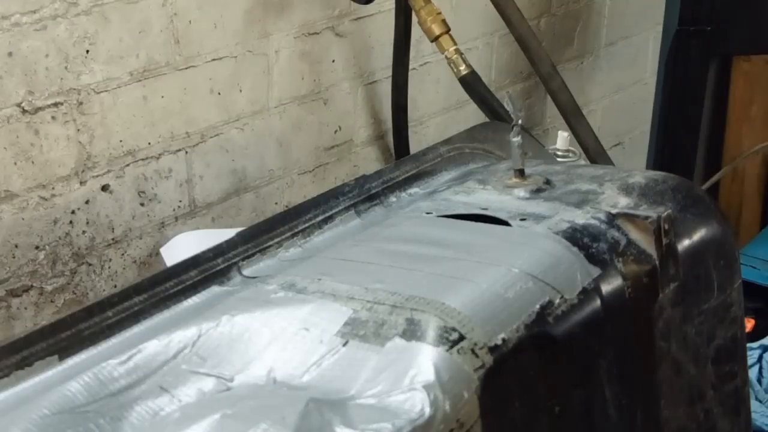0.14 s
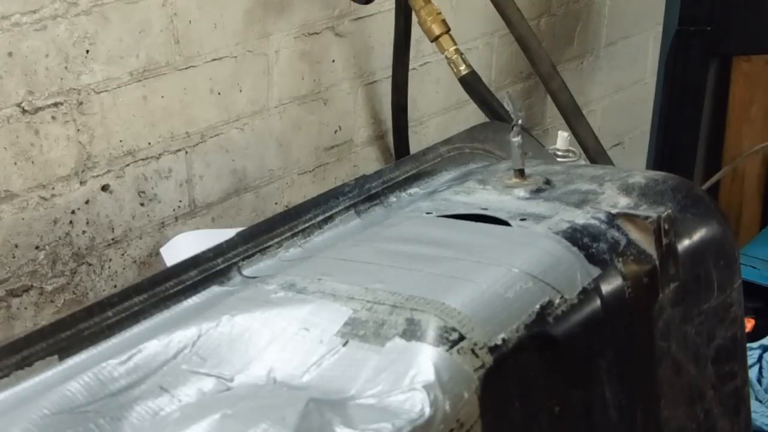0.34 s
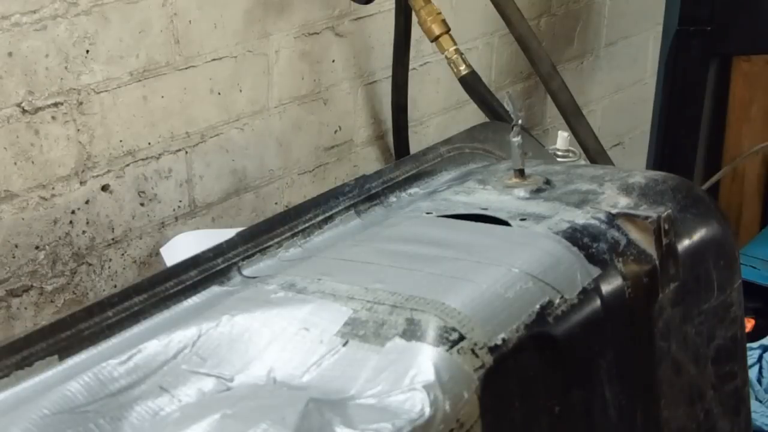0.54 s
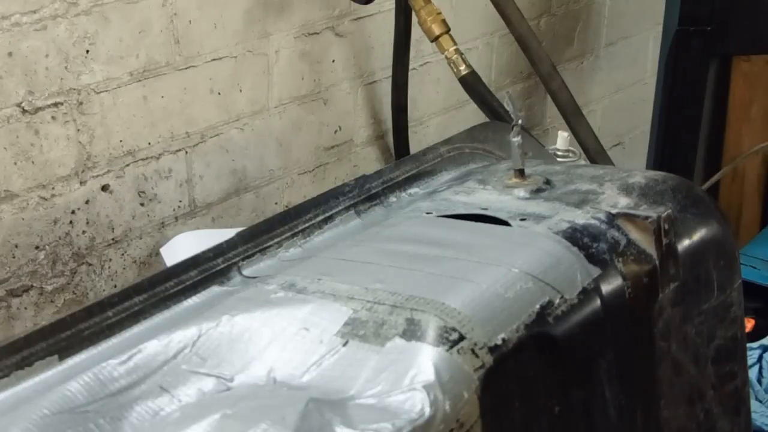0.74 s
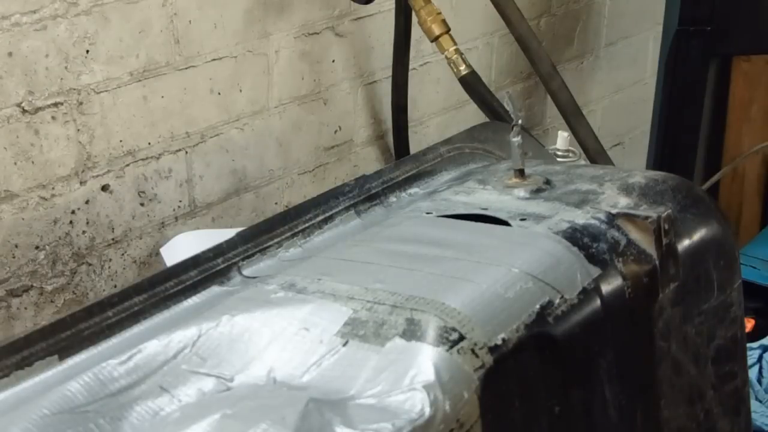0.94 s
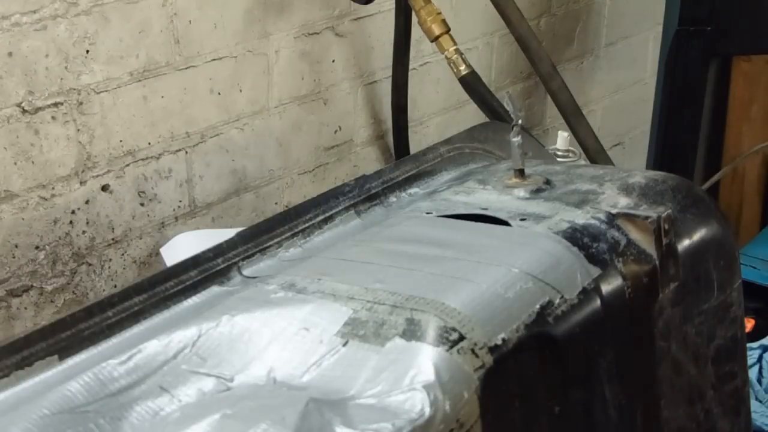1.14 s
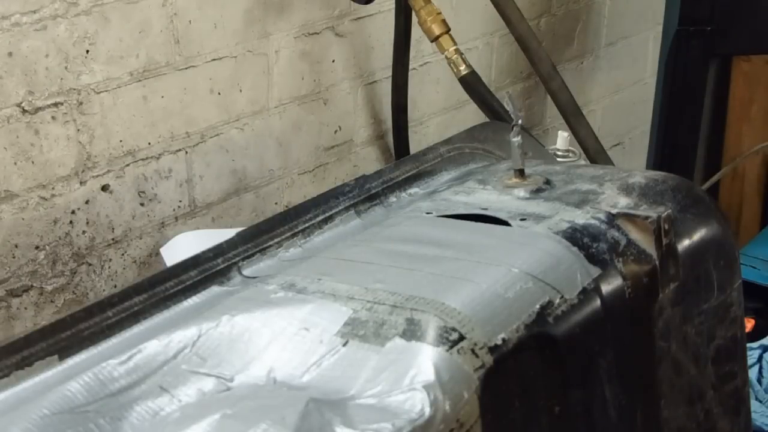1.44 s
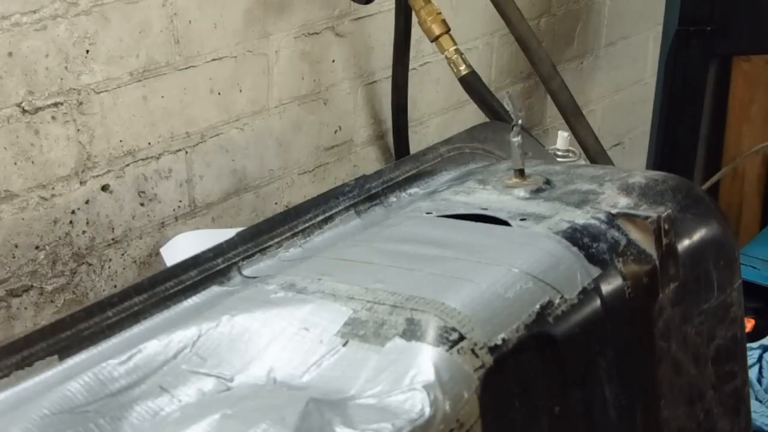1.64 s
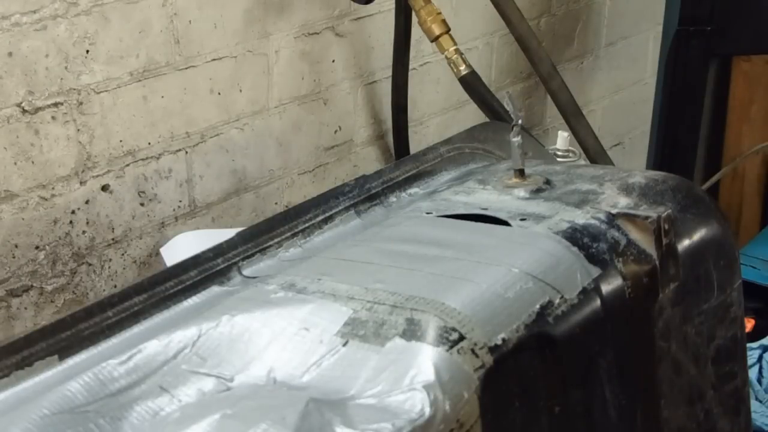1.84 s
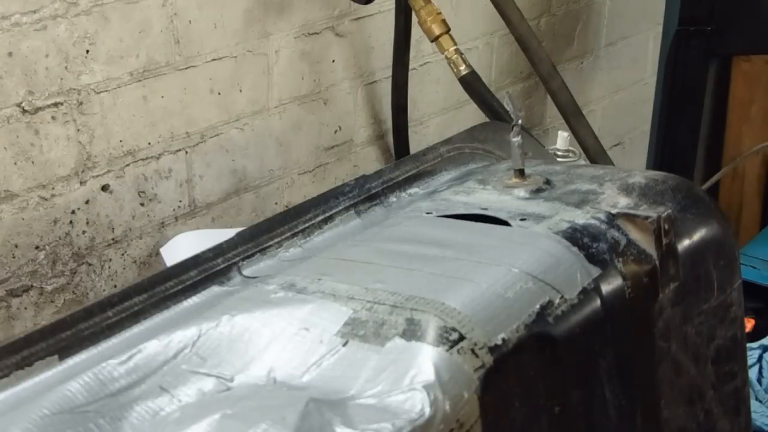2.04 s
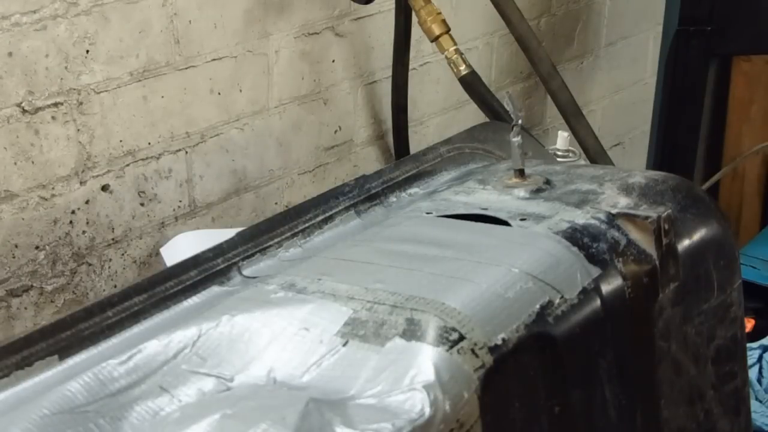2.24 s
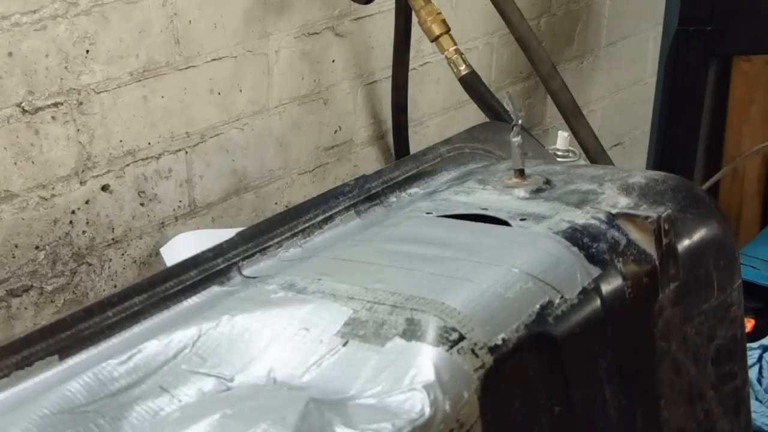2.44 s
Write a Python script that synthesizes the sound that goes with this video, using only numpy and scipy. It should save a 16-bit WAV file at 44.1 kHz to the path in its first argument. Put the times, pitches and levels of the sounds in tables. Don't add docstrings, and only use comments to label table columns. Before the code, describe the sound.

Quick crackling rips of adhesive tape, separated by pauses, with a faint ringing off hard walls

```python
import sys
import numpy as np
from scipy import signal
from scipy.fft import rfft, irfft, next_fast_len
from scipy.io import wavfile
from scipy.ndimage import uniform_filter1d

SR = 44100
rng = np.random.default_rng(int(sys.argv[2]) if len(sys.argv) > 2 else 0)


def amplitude_ratio(level_db):
    exponent = np.asarray(level_db, float) / 20
    return 10 ** exponent


def to_wav(s):
    ch = np.atleast_2d(s).T
    pcm = np.round(np.clip(ch, -1, 1) * 32767)
    wavfile.write(sys.argv[1], SR, pcm.astype(np.int16))


N = 114660
EARLY_S = 0.12
M = N + round(EARLY_S * SR)

# t/s, level/dB
PULL_EFFORT = [
    [(.2155, -33), (.226, -27), (.24, -21), (.25, -16.5), (.27, -18.5), (.292, -20.5), (.31, -28.5),
     (.345, -35)],
    [(.467, -33), (.481, -29.5), (.493, -26.5), (.497, -18), (.508, -21.5), (.525, -17), (.545, -19),
     (.6, -27)],
    [(.756, -44), (.772, -37), (.781, -30.5), (.792, -23), (.806, -29.5), (.825, -32.5), (.85, -40.5),
     (.89, -40)],
    [(1.018, -36.5), (1.029, -48), (1.034, -25.5), (1.045, -22.5), (1.058, -25.5), (1.07, -24.5),
     (1.085, -33), (1.13, -33)],
    [(1.331, -36), (1.342, -44), (1.347, -33), (1.353, -35), (1.375, -40), (1.4, -45.5), (1.44, -34)],
    [(1.681, -39), (1.695, -38.5), (1.699, -35.5), (1.706, -35.5), (1.714, -47), (1.77, -54)],
    [(2.289, -65), (2.302, -51), (2.318, -41.5), (2.334, -36), (2.345, -22.5), (2.352, -32), (2.358, -26),
     (2.364, -35), (2.39, -29)],
]
# t/s, level/dB
FIRST_PULL = [(-.1, -18.5), (-.06, -25.5), (-.02, -16.5), (-.005, -21.5)]
# strip f/Hz, roll f/Hz, roll level/dB, fizz level/dB,
# strip pitch spread (log), narrow ring level/dB
PULL_COLOUR = [(3000, 760, -6.5, -3, 0.37, -12), (3320, 590, -10.5, -3.5, 0.55, -24),
               (2900, 770, -12, -4, 0.36, -10), (3100, 756, -13, -4.5, 0.3, -20),
               (3360, 870, -20, -1, 0.48, -23), (3720, 614, -14, -1.5, 0.24, -25),
               (3370, 914, -9.5, -25, 0.12, -12), (3900, 1220, -16, -5.5, 0.48, -7.5)]
# f/Hz, level/dB
FIZZ_COLOUR = [(300, -8), (2000, -14.5), (5000, 5.5), (8000, -0.5), (11000, -8), (15500, -15)]
# f/Hz, t60/s
ROOM_T60 = [(150, 0.57), (500, 0.55), (1400, 0.63), (3700, 0.56), (9700, 0.56), (15000, 0.34)]
# f/Hz, level/dB per Hz
HISS_COLOUR = [(15, -32), (25, -11), (64, -3), (217, -11), (624, -7), (796, -12), (1330, -9.5),
               (14800, -26), (16000, -58)]
# f/Hz, level/dB
HUM = [(58, -79), (177, -77)]
# f/Hz, level/dB, t60/s
TANK_MODES = [(556, -31, 0.22), (787, -33, 0.1), (980, -27, 0.19), (1229, -31, 0.21), (1358, -40.5, 0.62),
              (1601, -29.5, 0.27), (1791, -27.5, 0.19), (2064, -29, 0.32), (2435, -36, 0.43),
              (2460, -34.5, 0.35)]
# t/s, f/Hz, level/dB, t60/s
TONES = [(-.02, 578.3, -38, 0.48), (-.02, 893, -40, 0.26), (-.02, 1044, -45, 0.44), (.21, 700, -30, 0.18),
         (.24, 647.5, -20, 0.093), (.245, 527, -24.5, 0.27), (.25, 1350, -27, 0.34),
         (.275, 481, -25.5, 0.31), (.285, 567, -25.5, 0.17), (.31, 397, -32, 0.32), (0.486, 980, -28, 0.14),
         (.49, 418, -31.5, 0.22), (.515, 796, -22.5, 0.27), (0.524, 1227, -33, 0.23),
         (.78, 497, -31.5, 0.18), (.78, 978, -31.5, 0.19), (.785, 630, -29, 0.15),
         (.785, 1242, -39.5, 0.23), (.83, 544, -47.5, 0.48), (0.861, 474, -48.5, 0.28),
         (1.022, 818, -36, 0.12), (1.031, 990, -41.5, 0.27), (1.055, 560, -34.5, 0.16),
         (1.067, 1203, -31.5, 0.27), (1.335, 435, -40.5, 0.17), (.52, 127, -41.5, 0.13),
         (.55, 230, -39.5, 0.34), (.785, 204.3, -37.5, 0.29), (1.031, 158, -41, 0.12),
         (1.036, 215.5, -37.5, 0.28), (1.34, 199, -46.5, 0.14)]
# t/s, peak level/dB, f/Hz, t60/s
PINGS = [(0.2085, -19.5, 3000, 0.014), (0.2447, -3.5, 3060, 0.0078), (0.2818, 3, 3900, 0.0046),
         (0.2866, -4.5, 3500, 0.013), (0.469, -9.5, 2800, 0.02), (0.5119, -4, 3200, 0.0087),
         (.5198, -7, 3030, 0.018), (.5285, -6, 3000, 0.0049), (.5455, -17, 3330, 0.0057),
         (1.044, -8.5, 4640, 0.011), (1.0524, -8.5, 3330, 0.017), (1.066, -6, 3370, 0.0062),
         (1.0743, -6, 3620, 0.0094), (1.3435, -15.5, 3960, 0.0075), (1.347, -11, 3860, 0.0048),
         (1.6966, -9, 3620, 0.003), (1.7044, -17, 2730, 0.012), (2.2553, -39, 3450, 0.0099),
         (2.3014, -41, 3720, 0.012), (2.304, -31, 3830, 0.011), (2.311, -25, 3760, 0.017),
         (2.3205, -21, 3810, 0.014), (2.3235, -16, 3900, 0.016), (2.3295, -13, 3900, 0.013),
         (2.334, -17, 3900, 0.016), (2.3419, -16, 4040, 0.027), (2.343, -18, 2210, .012),
         (2.3545, -19, 4300, 0.0088), (2.4756, -17.5, 2690, 0.0064)]
# t/s, peak level/dB, f/Hz, t60/s
CRACKS = [(0.2165, -14, 2510, 0.02), (0.4868, -12.5, 2400, 0.011), (0.4948, -10, 2680, 0.012),
          (0.5565, -14, 1880, 0.0067), (0.7561, -19.5, 5750, 0.0058), (0.7697, -20, 3270, 0.016),
          (1.0248, -14.5, 3140, 0.015), (1.0307, -12.5, 3200, 0.0058), (1.3315, -23, 2960, 0.0068),
          (1.5653, -43, 3460, 0.012), (1.5745, -44, 6000, .005), (1.665, -38, 5460, 0.0046),
          (1.6818, -42, 3790, 0.0048), (2.2899, -24, 3250, 0.0045), (2.2961, -33, 3840, 0.0088),
          (2.3574, -20, 2600, 0.012), (2.4868, -26, 2880, 0.0097)]
# t/s, f/Hz, level/dB, t60/s
THUMPS = [
    (.215, 600, -16, 0.17),
    (.27, 450, -24, 0.18),
    (0.509, 317, -30, 0.27),
    (1.031, 466, -35.5, 0.34),
    (1.689, 430, -37.5, 0.098),
]
# start t/s, length t/s, level/dB, f/Hz
RUBS = [
    (0.974, 0.042, -53, 3930),
    (1.533, 0.063, -58.5, 3800),
    (2.235, 0.031, -59.5, 980),
    (2.496, 0.05, -55.5, 2500),
]
FLIP_BEFORE = [.186, .441, 0.736, 0.991, 1.312, 1.654, 2.252, 2.61]
FLIP_AFTER = [0.238, 0.495, 0.769, 1.05, 1.349, 1.708, 2.308]
# start t/s, length t/s, edge f/Hz
DULL_MOMENTS = [(0.22, .05, 15000), (1.024, 0.03, 12100), (1.326, 0.022, 11900), (1.56, .012, 12500),
                (1.645, .025, 12500), (1.682, 0.028, 12300), (2.242, .02, 12400), (2.285, 0.02, 12300),
                (2.482, 0.011, 12500)]

SLIPS_PER_S, SIZE_SPREAD_DB, BIGGEST_SLIP = 7000, 3.5, 0.082
CLUMP_DB, CLUMP_S = 0.5, 0.0024
STRIP_CYCLES = 2.17
ROLL_SPREAD, ROLL_CYCLES, ROLL_FLOOR = 0.43, 4.1, 0.48
SING_SPREAD, SING_CYCLES = 0.049, 7
FIZZ_GRAIN = 0.65
LET_GO_S, LET_GO_DB = 0.025, -14
HISS_DB = -58.5
ROOM_DB, ROOM_GAP_S = -7.5, 0.004
EARLY_LIFT, EARLY_LIFT_S = 0.61, 0.057
TONE_RISE_S, WAVER, WAVER_S = 0.012, 0.5, 0.0086
PING_NOISE_DB, CRACK_NOISE_DB = -12, 1
SNAP_SPREAD, SNAP_LOW_HZ, SNAP_RISE_S = 0.12, 700, 0.00035
THUMP_RISE_S = 0.028
FLIP_SLOW_S, FLIP_QUICK_S, FLIP_SHARE, FLIP_HZ = 0.031, 0.015, 0.84, 6800
LOW_CUT_HZ, EDGE_HZ = 125, 15700


def evened(x):
    return x / np.sqrt(np.mean(x ** 2) + 1e-20)


def read(points, hz):
    f, value = np.transpose(points)
    return np.interp(np.log(hz + 1), np.log(f + 1), value)


def colour(x, points):
    hz = np.fft.rfftfreq(x.shape[-1], 1 / SR)
    return irfft(rfft(x) * amplitude_ratio(read(points, hz)), x.shape[-1])


def above(x, hz, order=3):
    return signal.sosfilt(signal.butter(order, hz, "high", fs=SR, output="sos"), x)


def treble_of(x, hz):
    return signal.oaconvolve(x, signal.firwin(401, hz, pass_zero=False, fs=SR), "same")


def add(mix, s, sound):
    start = max(round((s + EARLY_S) * SR), 0)
    part = mix[start:][:len(sound)]
    part += sound[:len(part)]


def ring(hz, t60):
    t = np.arange(0, t60, 1 / SR)
    return amplitude_ratio(-60 * t / t60) * np.sin(2 * np.pi * hz * t) * np.minimum(t * hz * 2, 1)


def rings(slips, hz, spread, cycles, count=24):
    pick = rng.integers(0, count, len(slips))
    shift = np.linspace(-1.6, 1.6, count)
    out = np.zeros(len(slips) + 2000)
    for k in range(count):
        f = hz * np.exp(spread * shift[k])
        weight = np.sqrt(f / hz) * np.exp(-shift[k] ** 2 / 4)
        part = np.convolve(slips * (pick == k), ring(f, 3 * cycles / f)[:2000] * weight)
        out[:len(part)] += part
    return evened(out)


def slipping(level_db):
    n = len(level_db)
    chance, happens, sign = rng.random((3, n))
    clump = evened(uniform_filter1d(rng.standard_normal(12000), int(CLUMP_S * SR)))[:n]
    size_db = -SIZE_SPREAD_DB * np.log(chance + BIGGEST_SLIP) + CLUMP_DB * np.clip(clump, -1.2, 1.5)
    clicks = amplitude_ratio(size_db) * (happens < SLIPS_PER_S / SR) * np.sign(sign - 0.5)
    return evened(clicks) * amplitude_ratio(level_db)


def pull(effort, strip_hz, roll_hz, roll_db, fizz_db, spread, sing_db):
    s, level_db = np.transpose(effort)
    level_db = np.interp(np.arange(s[0], s[-1], 1 / SR), s, level_db)
    left = np.arange(len(level_db))[::-1] / (LET_GO_S * SR)
    level_db = level_db + LET_GO_DB * np.clip(1.5 - left, 0, 1) ** 2
    slips = slipping(level_db)
    size = np.sqrt(np.sum(slips ** 2) / (len(slips) + 2000))
    fine = rng.standard_normal(len(slips)) * amplitude_ratio(level_db) + FIZZ_GRAIN * slips
    sound = rings(slips, strip_hz, spread, STRIP_CYCLES)
    sound = sound + amplitude_ratio(fizz_db) * evened(colour(np.pad(fine, (0, 2000)), FIZZ_COLOUR))
    sound = sound + amplitude_ratio(sing_db) * rings(slips, strip_hz, SING_SPREAD, SING_CYCLES)
    sound = sound + amplitude_ratio(roll_db) * rings(slips, roll_hz, ROLL_SPREAD, ROLL_CYCLES)
    return s[0], above(size * sound, ROLL_FLOOR * roll_hz)


def tank(x):
    shell = np.zeros(SR)
    for hz, db, t60 in TANK_MODES:
        mode = amplitude_ratio(db - 24.5) * ring(hz, min(t60, 0.9))
        shell[:len(mode)] += mode
    return signal.fftconvolve(x, shell)[:M]


def room(x):
    taps = np.zeros(SR)
    at = np.arange(round(ROOM_GAP_S * SR), SR - 12, 12)
    taps[at + rng.integers(0, 12, len(at))] = rng.choice([-1., 1.], len(at))
    hz, t, z = signal.stft(taps, SR, nperseg=256)
    fade = amplitude_ratio(-60 * t / read(ROOM_T60, hz)[:, None])
    lift = 1 + EARLY_LIFT * np.exp(-t / EARLY_LIFT_S)
    tail = signal.istft(z * fade * lift, SR, nperseg=256)[1]
    return signal.fftconvolve(x, tail / np.linalg.norm(tail))[:M]


def floor():
    t = np.arange(M) / SR
    sound = amplitude_ratio(HISS_DB) * evened(colour(rng.standard_normal(M), HISS_COLOUR))
    for hz, db in HUM:
        drift = np.cumsum(rng.standard_normal(M)) * 0.0097
        sound = sound + amplitude_ratio(db) * np.sin(2 * np.pi * hz * t + drift)
    return sound


def tone(s, hz, db, t60):
    body = ring(hz, t60)
    width = int(WAVER_S * SR)
    wander = uniform_filter1d(uniform_filter1d(rng.standard_normal(SR), width), width)
    waver = 1 + WAVER * evened(wander)[:len(body)]
    rise = np.minimum(np.arange(len(body)) / (TONE_RISE_S * SR), 1)
    return s, amplitude_ratio(db) * body * waver * rise


def snap(s, db, hz, t60, noise_db):
    body = ring(hz, t60)
    t, f = np.arange(len(body)) / SR, np.fft.rfftfreq(4000, 1 / SR)
    peak = np.exp(-(np.log((f + 1) / hz) / SNAP_SPREAD) ** 2 / 2)
    wide = 1.44 / (1 + (f / 7000) ** 2) * np.minimum(f / SNAP_LOW_HZ, 1) ** 4
    burst = evened(irfft(rfft(rng.standard_normal(4000)) * (peak + wide)))[:len(body)]
    burst = burst * amplitude_ratio(noise_db - 50 * t / t60) * np.minimum(t / SNAP_RISE_S, 1)
    return s, amplitude_ratio(db - 5.5) * (body + burst)


def thump(s, hz, db, t60):
    t = np.arange(0, t60, 1 / SR)
    shove = rng.standard_normal(len(t)) * np.minimum(t / THUMP_RISE_S, 1) * amplitude_ratio(-60 * t / t60)
    return s, amplitude_ratio(db - 23.5) * signal.fftconvolve(shove, ring(hz, 20.7 / hz))


def rub(s, length, db, hz):
    t = np.arange(0, length, 1 / SR)
    slips = slipping(10 * np.log10(np.sin(np.pi * t / length) + 1e-3))
    return s, amplitude_ratio(db) * above(rings(slips, hz, 0.61, 2.5), ROLL_FLOOR * hz)


def scene():
    under, tape = floor(), np.zeros((3, M))
    for k, (effort, row) in enumerate(zip([FIRST_PULL] + list(PULL_EFFORT), PULL_COLOUR)):
        add(tape[k % 3], *pull(effort, *row))
    for row in TONES:
        add(under, *tone(*row))
    for table, noise_db in ((PINGS, PING_NOISE_DB), (CRACKS, CRACK_NOISE_DB)):
        for k, row in enumerate(table):
            add(tape[k % 3], *snap(*row, noise_db))
    for row in THUMPS:
        add(tape[0], *thump(*row))
    for row in RUBS:
        add(tape[1], *rub(*row))
    direct = tape.sum(0)
    echoes = amplitude_ratio(ROOM_DB) * sum(room(x) for x in tape)
    mono = above(direct + tank(direct) + echoes, LOW_CUT_HZ, order=2) + under
    return np.tile(mono[-N:], (2, 1))


def flips():
    t, share = np.arange(N) / SR, np.zeros(N)
    for times, rise, fall in ((FLIP_BEFORE, FLIP_SLOW_S, FLIP_QUICK_S), (FLIP_AFTER, FLIP_QUICK_S, FLIP_SLOW_S)):
        for s in times:
            ramp = 1.17 * np.minimum(1 + (t - s) / rise, 1 - (t - s) / fall)
            share = np.maximum(share, np.clip(ramp, 0, 1))
    return FLIP_SHARE * share


def dulled(mono):
    t = np.arange(N) / SR
    for s, length, hz in DULL_MOMENTS:
        mono = mono - treble_of(mono, hz) * np.clip(np.minimum(t - s, s + length - t) / 0.004, 0, 1)
    return mono


def roll_off(x):
    return signal.sosfilt(signal.butter(12, 16290, fs=SR, output="sos"), x)


def record(dry):
    mono = dulled(dry[0])
    treble = signal.hilbert(treble_of(mono, FLIP_HZ), next_fast_len(N))[:N]
    turn = np.pi / 2 * flips()
    mid = mono - treble.real * (1 - np.cos(turn))
    side = treble.imag * np.sin(turn)
    both = np.array([mid + side, mid - side])
    band_limit = signal.firwin(511, EDGE_HZ, window=("kaiser", 9), fs=SR)
    both = signal.oaconvolve(both, band_limit[None], "same")
    return roll_off(both)


dry = scene()
out = record(dry)
to_wav(out)
```